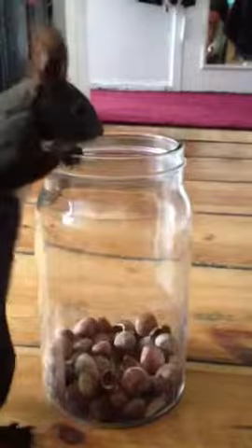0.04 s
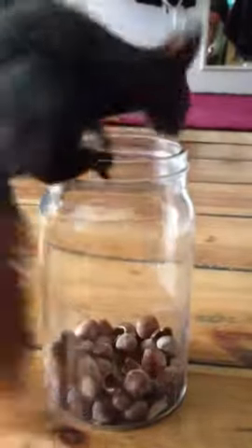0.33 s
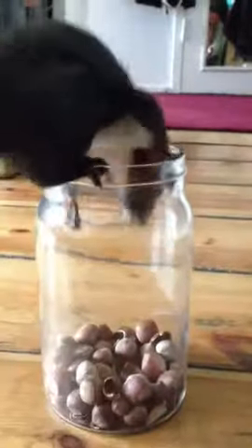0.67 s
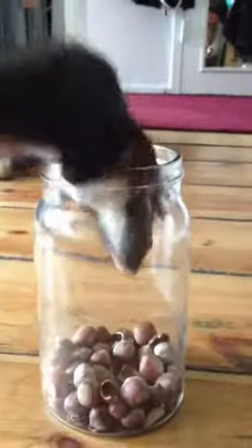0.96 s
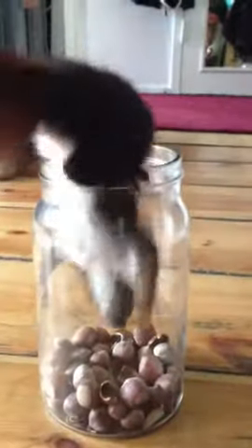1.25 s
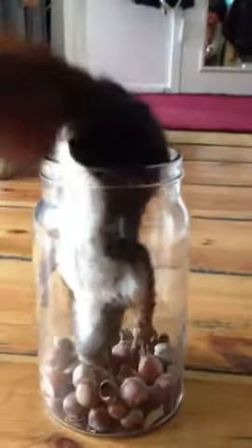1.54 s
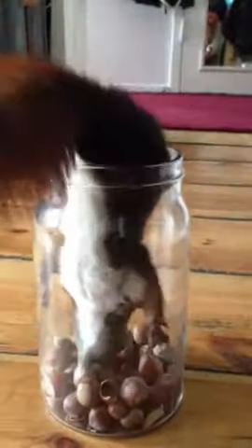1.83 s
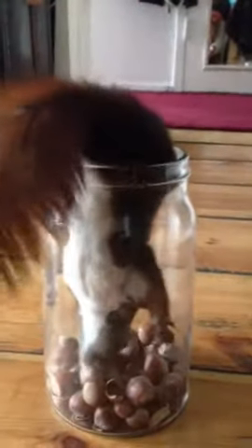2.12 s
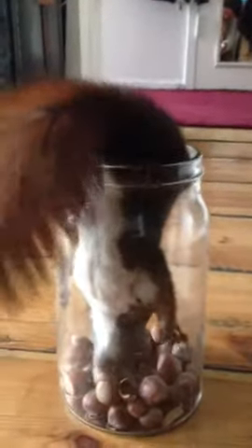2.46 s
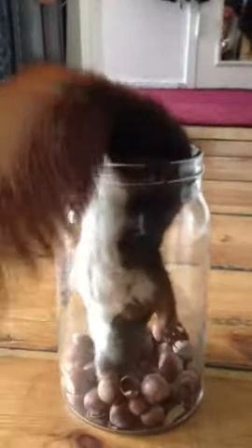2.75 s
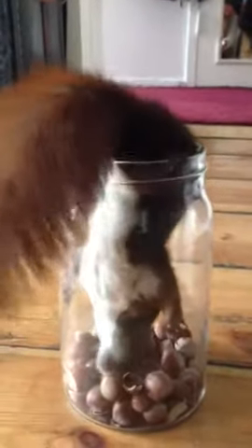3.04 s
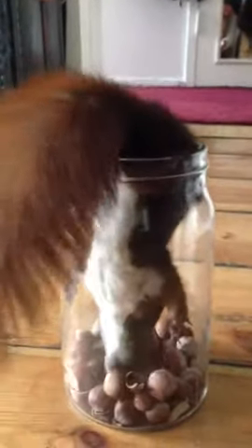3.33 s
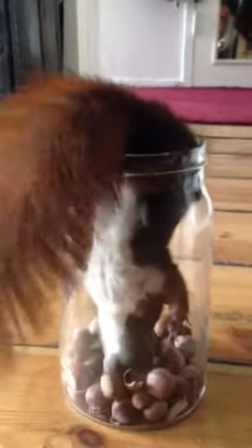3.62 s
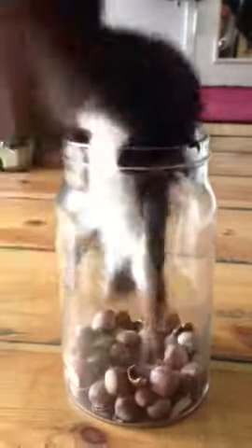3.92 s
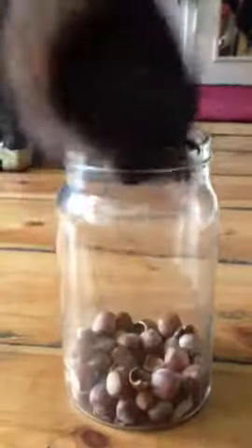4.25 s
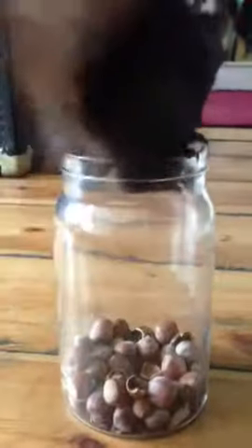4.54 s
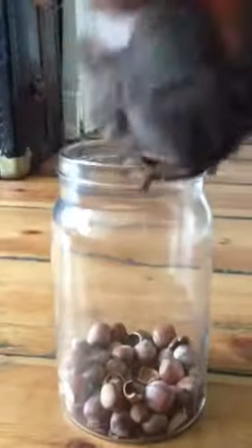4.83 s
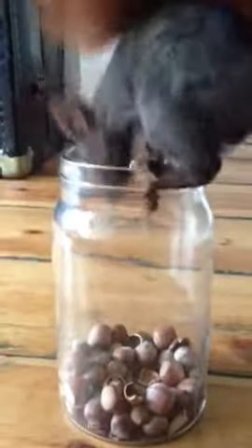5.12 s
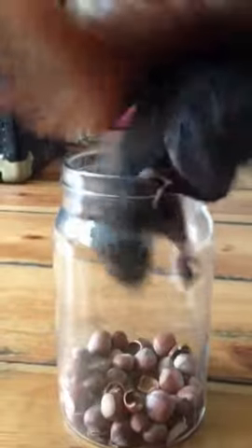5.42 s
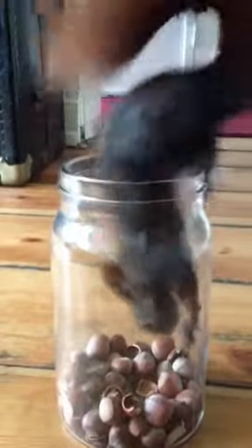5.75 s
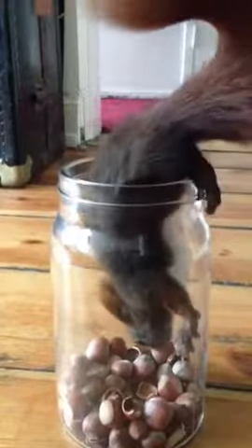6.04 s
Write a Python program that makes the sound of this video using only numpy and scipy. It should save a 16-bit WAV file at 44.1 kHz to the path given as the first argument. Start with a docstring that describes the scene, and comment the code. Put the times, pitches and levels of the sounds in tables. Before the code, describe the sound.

A squirrel rummages in a glass jar, nuts clinking and claws ticking on the glass, with soft thuds on a wooden floor.

```python
"""In a small, quiet room, a glass jar of hazelnuts stands on a wooden floor, and a squirrel rummages in it.
Nuts clink against the glass and make it ring; the loudest one strikes and rattles to rest.
Claws tick and scratch on the wall, soft paws bump it, and fur rubs over the rim.
The squirrel's shifting weight makes the jar thud on the floorboards."""
import sys
import numpy as np
from scipy import signal
from scipy.fft import rfft, irfft, next_fast_len
from scipy.io import wavfile
from scipy.ndimage import map_coordinates

SR = 44100
rng = np.random.default_rng(int(sys.argv[2]) if len(sys.argv) > 2 else 0)


def dump(signal):
    """Clip the signal to [-1, 1] and save it as 16-bit WAV at the path in sys.argv[1]."""
    limited = np.clip(np.atleast_2d(signal).T, -1, 1)
    pcm = np.round(limited * 32767).astype(np.int16)
    wavfile.write(sys.argv[1], SR, pcm)


N = 268128
AGE = np.arange(SR // 2) / SR  # seconds since a hit

# The jar's own tones, called modes: f/Hz, level/dB, time to fade by 60 dB/s
JAR_MODES = [(1309, 0, .24), (2632, 0, .09), (3060, -13, .05), (3120, -2, .07), (3195, -5, .06),
             (3320, -9, .04), (4070, -4, .07), (4158, -2, .09), (4215, -11, .06), (5544, 0, .08),
             (5615, -14, .05), (5921, -14, .11), (6342, -17, .12), (6563, -23, .12), (6819, -17, .12),
             (7425, -8, .11), (7668, -3, .09), (8595, -10, .07), (8755, -12, .08), (9635, -11, .07),
             (9842, -1, .08), (11420, -16, .06), (11600, -15, .06), (11795, -10, .09), (14030, -19, .07),
             (14860, -17, .07)]
# How strongly a nut rings the modes: f/Hz, level/dB
NUT_TONE = [(1310, -22.5), (2630, -15), (3150, -13.5), (4150, -16), (5550, -12.5)]
# How much of a hit's hardness reaches each mode: f/Hz, share
HARDNESS_SHARE = [(3200, 0.026), (4150, 0.48), (5550, 0.96)]
# Nuts hitting the glass: t/s, level/dB, shell f/Hz, hardness/dB, crack level/dB, ring length factor
NUT_HITS = [(2.757, -58.5, 2740, 0, -10, 2.7), (2.936, -71, 2080, -5, 10, .7),
            (2.951, -60.5, 2800, 23, -0.5, 0.75), (3.084, -61, 2550, -5, -12, 3.4),
            (3.118, -59, 3020, 0, 2.5, 1.9), (3.148, -47.5, 3120, -9, 2.5, 0.6),
            (3.1544, -34.5, 3000, 2, -12, 1.3), (3.291, -61.5, 3270, 0, 1, .9),
            (3.36, -55, 3360, 4, -1.5, 1.8), (3.5072, -34, 2870, -2.5, -18, 1.5),
            (3.532, -30.5, 2480, -24, -17, .7), (3.7, -39.5, 2960, -9, -21, 1.27),
            (3.807, -45, 3280, 6.5, -8, 1.5), (4.1298, -24, 3200, 1, -7, 1.3),
            (4.151, -31, 3150, 17, -6, 1.4), (4.16, -17, 2835, 14, -19, 0.98)]
def nuts():
    """Nuts crack against the wall and ring it; their round shells barely stir the high modes."""
    out, hz = np.zeros(N), np.transpose(JAR_MODES)[0]
    dull_db = along([(5600, 0), (5900, -2), (6400, -3), (7400, -12), (7700, -19), (8700, -18),
                     (9800, -40), (11500, -28)], hz)
    for s, db, shell_hz, hard_db, crack_db, sustain in NUT_HITS + rattle():
        shell_db = 14.5 * near(hz, shell_hz, octaves=0.23)  # modes near the shell's pitch ring more
        gains_db = along(NUT_TONE, hz) + shell_db + hard_db * along(HARDNESS_SHARE, hz) + dull_db + 2
        glass = ring(JAR_MODES, gains_db, attack_s=0.0031, sustain=sustain)
        clink = glass + amp(crack_db + 4.5) * crack(shell_hz)
        add(out, s, amp(db) * in_room(clink, wet_db=-19.5))
    return out


def crack(shell_hz):
    """A hard nutshell gives a burst of noise and a short, rough ring at its own pitch."""
    colour = [(100, -15), (400, 3), (800, -4.5), (1150, 0), (1550, 0.5), (2000, -7), (2800, 3),
              (5200, -2.5), (7000, -15.5), (10000, -18.5), (15000, -30)]
    burst = noise(colour, len(AGE)) * fade(0.043)
    band = [(ratio * shell_hz, db) for ratio, db in [(.6, -60), (.93, -14), (1, 0), (1.07, -14), (1.6, -60)]]
    shell = noise(band, len(AGE)) * fade(0.049)
    return (burst + 0.97 * shell) * rise(0.00096)


def rattle():
    """After the loudest hit the nuts settle in seven ever weaker taps, each with another shell."""
    s, db, shell_hz, *_ = max(NUT_HITS, key=lambda nut: nut[1])
    length_s, fade_db_per_s, crack_db = 0.11, 64, -13.5
    taps = []
    for when, pitch in rng.random((7, 2)):
        delay_s = length_s * when
        tap_db = db - 21 - fade_db_per_s * delay_s
        tap_hz = shell_hz * 2 ** ((pitch - .5) / 2)
        taps.append((s + delay_s, tap_db, tap_hz, 0, crack_db, 1))
    return taps


# The floorboards' own tones: f/Hz, level/dB, time to fade by 60 dB/s
BOARD_MODES = [(100.2, -21, 0.25), (157.2, -4, 0.14), (174.8, -3, 0.14), (271, 7.5, 0.063),
               (331.9, 2, 0.095), (355, 0, 0.027), (452, -15.5, 0.065), (640, -13, 0.056)]
# Heavy steps that rock the jar: t/s, level/dB, boost of the higher board modes/dB
HEAVY_STEPS = [(0.231, -29, -5.5), (0.308, -34.5, -11), (0.345, -33, 0.5), (0.531, -51.5, 12.5),
               (0.988, -39, 1.5), (1.164, -45.5, 8), (1.214, -36, 1), (2.749, -52, 5.5), (2.954, -45.5, -1),
               (3.15, -46, 8.5), (3.354, -34, -0.5), (3.545, -46, 1), (4.125, -33.5, 8), (4.182, -35, 0.5),
               (4.267, -28, 1), (4.354, -31.5, -1), (4.385, -35, -6), (4.432, -33.5, -2), (4.468, -36, -11),
               (4.649, -39.5, -1), (4.761, -47.5, 12), (4.787, -33.5, 5), (4.842, -36.5, -8),
               (4.909, -39.5, -3), (4.947, -48, 3.5), (5.166, -47, 7), (5.235, -51, 4), (5.322, -45, 4),
               (5.384, -40, 0), (5.823, -41.5, 3)]
def thuds():
    """Soft paws push the jar onto the boards and stir only the lowest mode of the glass."""
    out, is_upper = np.zeros(N), np.transpose(BOARD_MODES)[0] > 220
    scuff_colour = [(25, -30), (90, 7.5), (300, 1.5), (700, 1.5), (1500, -25.5), (6000, -50.5)]
    push = 1 - np.exp(-(AGE / .006) ** 2)  # the paw takes up the weight gradually
    for s, db, upper_db in HEAVY_STEPS + patter():
        wood = amp(db - 2.5) * ring(BOARD_MODES, is_upper * upper_db, attack_s=0.00417, sustain=0.71)
        scuff = amp(db - 10.5) * fade(0.053) * noise(scuff_colour, len(AGE))
        glass = amp(db - 36) * ring(JAR_MODES[:1], [0], attack_s=0.0064)
        add(out, s, in_room((wood + scuff) * push + glass, wet_db=-13))
    return out


# How strongly a claw rings the modes: f/Hz, level/dB
CLAW_TONE = [(1310, -13), (2630, -8.5), (3150, -6), (4150, -0.5), (5550, -3), (7600, -2.5), (9800, 0)]
# Claws tapping the glass: t/s, level/dB, brightness/(dB per octave), the spot's favourite f/Hz
CLAW_TAPS = [(0.205, -51.5, 2, 2630), (0.482, -55, 0.5, 10800), (.729, -59, 1.5, 10300),
             (1.175, -71, -1, 5550), (1.369, -74, -9, 4150), (1.535, -75.5, -7.5, 3100),
             (4.061, -53, 2.5, 4480), (4.708, -60.5, -3.5, 9000), (4.751, -58.5, 5.5, 3300),
             (5.427, -60, 7.5, 4230), (5.625, -70.5, -14, 4150), (5.74, -69, 6, 11400),
             (5.768, -62.5, 8.5, 4150), (5.788, -47, -0.5, 4100), (5.789, -49.5, -0.5, 7860)]
def claws():
    """Sharp claws tick on the glass and ring it right up to its highest modes."""
    out, hz = np.zeros(N), np.transpose(JAR_MODES)[0]
    tick_colour = [(500, -20), (3500, -3), (8700, 0), (15000, -3)]
    for s, db, bright_db, spot_hz in CLAW_TAPS:
        # each spot on the wall favours the modes near one pitch
        spot_db = 13.5 * near(hz, spot_hz, octaves=0.2) + 1.5 * rng.standard_normal(len(hz))
        gains_db = along(CLAW_TONE, hz) + bright_db * np.log2(hz / 5000) + spot_db + 1.5
        ping = ring(JAR_MODES, gains_db, attack_s=.001, sustain=1.1)
        tick = noise(tick_colour, len(AGE)) * fade(.07) * rise(.0015)
        add(out, s, amp(db) * in_room(ping + amp(bright_db + 2) * tick, wet_db=-18.5))
    return out


# Soft paws bumping the glass: t/s, level/dB
PAW_BUMPS = [(0.308, -61), (.729, -71), (0.987, -61.5), (2.758, -66), (3.118, -59), (3.382, -58),
             (3.701, -55.5), (4.062, -57), (4.384, -52.5), (4.75, -58), (4.901, -63), (5.166, -59.5),
             (5.235, -57.5), (5.625, -49.5)]
def paws():
    """A soft paw on the wall sounds only the jar's lowest mode."""
    out = np.zeros(N)
    for s, db in PAW_BUMPS:
        add(out, s, amp(db) * ring(JAR_MODES[:1], [0], attack_s=0.0022))
    return in_room(out, wet_db=-18)


# Nut hitting nut: t/s, level/dB
SHELL_KNOCKS = [(.029, -46), (.034, -59), (1.54, -64), (1.885, -64), (2.07, -59), (3.298, -56),
                (4.005, -56.5)]
def shells():
    """Nuts knock against each other, hollow and without any ring."""
    out = np.zeros(N)
    colour = [(150, -6), (600, -1), (1800, -11), (2600, -22.5), (14000, -38)]
    for s, db in SHELL_KNOCKS:
        add(out, s, amp(db) * noise(colour, len(AGE)) * fade(0.041))
    return in_room(out, wet_db=-12)


# Spells of scratching: start t/s, end t/s, level/dB
SCRATCH_SPELLS = [(.33, .4, -68), (1.1, 1.35, -73), (2.6, 3.12, -73), (3.28, 3.44, -68), (5.25, 5.6, -72)]
def scratches():
    """Claws skid over the wall in faint slips at random moments, each at a new spot."""
    out, hz = np.zeros(N), np.transpose(JAR_MODES)[0]
    gains_db = along([(1300, -11), (2600, 4), (4100, 4), (5500, 3), (8000, -18), (12000, 9)], hz)
    skid_colour = [(300, -23), (1500, 16.5), (6000, -0.5), (15000, -28.5)]
    for start, end, db in SCRATCH_SPELLS:
        for s in rng.uniform(start, end, size=2 + int(20 * (end - start))):
            spot_db = 3 * rng.standard_normal(len(hz))
            skid = noise(skid_colour, len(AGE)) * fade(0.047)
            glass = ring(JAR_MODES, gains_db + spot_db, attack_s=0.0016, sustain=0.59)
            add(out, s, amp(db) * (glass + skid))
    return in_room(out, wet_db=-6)


# How busy fur and feet are: t/s, level/dB
ACTIVITY = [(0.0, -65), (.2, -63), (.4, -56.5), (.75, -63), (1.15, -64.5), (1.35, -73), (2.4, -72),
            (3.4, -66.5), (4.1, -67), (4.3, -56), (4.55, -59), (4.84, -58.5), (4.98, -68), (5.2, -71),
            (5.4, -60.5), (6.08, -65.5)]
def patter():
    """Light steps fall at random moments, stronger when the squirrel is busy."""
    steps_per_s, scatter_db, upper_db = 9.7, 2, 9
    count = int(steps_per_s * N / SR)
    times = (np.arange(count) + rng.random(count)) / steps_per_s
    levels = np.interp(times, *np.transpose(ACTIVITY)) + 3 + scatter_db * rng.standard_normal(count)
    return [(s, db, upper_db) for s, db in zip(times, levels)]


# The low murmur of the boards: f/Hz, level/dB
MURMUR_TONE = [(24, -54), (40, -23), (129, -2), (156, 6.5), (230, -6.5), (282, -1), (323, 4), (374, -29),
               (411, -4), (477, -16.5), (608, -14), (1000, -38), (1300, -56.5), (2200, -120)]
def shuffle():
    """Many tiny pushes of fur and feet keep the boards murmuring."""
    level_db = np.interp(np.arange(N) / SR, *np.transpose(ACTIVITY)) + 0.5
    pushes = amp(2 * wobble(per_s=35))
    return amp(level_db) * unit(pushes * noise(MURMUR_TONE, N))


# Sliding over the rim: t/s, level/dB
RIM_SLIDE = [(0.62, -82), (1.15, -73.5), (1.3, -94)]
def rub():
    """Fur and paws slide over the rim and draw a soft, wavering tone from the lowest mode."""
    level_db = np.interp(np.arange(N) / SR, *np.transpose(RIM_SLIDE), left=-120, right=-120)
    tone = noise([(1000, -90), (1260, -22), (1309, 0), (1345, -5), (1400, -20), (1700, -90)], N)
    return amp(level_db) * tone


# The background hush: f/Hz, level/dB
HUSH_TONE = [(15, -70), (25, -40.5), (75, -12), (86, -13), (122, -27), (178, 1), (289, -6), (331, -7.5),
             (666, -9), (945, -9.5), (1340, -12.5), (3830, -14.5), (13900, -17), (15500, -18.5)]
def hush():
    """The quiet room is a steady, low rumble with a faint hiss."""
    return amp(-64) * noise(HUSH_TONE, N)


# How long the room echoes: f/Hz, time to fade by 60 dB/s
ROOM_DECAY = [(150, 0.35), (1300, 0.56), (3000, 0.44), (7000, 0.27), (14000, 0.054)]
def in_room(x, wet_db):
    """Add the room's echo at level wet_db; its high notes die away fastest."""
    hz, t, spectrum = signal.stft(rng.standard_normal(len(AGE)), SR, nperseg=256)
    decay = np.exp(-np.log(1000) * t / along(ROOM_DECAY, hz)[:, None])
    tail = signal.istft(spectrum * decay, SR, nperseg=256)[1][:len(AGE)]
    tail *= rise(.01)  # the walls take a moment to answer
    return x + amp(wet_db) * signal.fftconvolve(x, tail / np.linalg.norm(tail))[:len(x)]


def ring(modes, gains_db, attack_s, sustain=1):
    """Fading tones, struck a little differently every time; sustain scales how long they last."""
    chance = rng.standard_normal((len(modes), 2))
    tones = sum(amp(db + gain + stray_db) * fade(t60 * sustain) * np.sin(2 * np.pi * hz * AGE + np.pi * phase)
                for (hz, db, t60), gain, (stray_db, phase) in zip(modes, gains_db, chance))
    return tones * rise(attack_s)


def noise(colour, size):
    """Noise of strength 1, shaped by (f/Hz, level/dB) points."""
    gains = amp(along(colour, np.fft.rfftfreq(size, 1 / SR)))
    return unit(irfft(rfft(rng.standard_normal(size)) * gains, size))


def rise(attack_s):
    """Swell from 0 towards 1 after a hit."""
    return 1 - np.exp(-AGE / attack_s)


def fade(t60):
    """Die away after a hit, by 60 dB in t60 seconds."""
    return np.exp(-np.log(1000) * AGE / t60)


def wobble(per_s):
    """A smooth curve through per_s random values a second."""
    return map_coordinates(rng.standard_normal(int(N * per_s / SR) + 4), [np.arange(N) * per_s / SR])


def near(hz, centre_hz, octaves):
    """1 for a mode at the centre pitch, falling to 0 further off."""
    return np.exp(-(np.log2(hz / centre_hz) / octaves) ** 2)


def along(points, hz):
    """Read between (f/Hz, value) points on a pitch scale."""
    f, values = np.transpose(points)
    return np.interp(np.log(hz + 1), np.log(f + 1), values)


def amp(db):
    """Turn decibels into a volume factor."""
    return 10 ** (np.asarray(db) / 20)


def unit(x):
    """Scale x to an average strength (rms) of 1."""
    return x / np.sqrt(np.mean(x ** 2) + 1e-20)


def add(track, s, x):
    """Mix x into the track at time s."""
    part = track[round(s * SR):][:len(x)]
    part += x[:len(part)]


def scene():
    """Glass, nuts and boards sound over the hush of the room."""
    glass = nuts() + claws() + paws() + scratches() + rub()
    return (glass + shells() + thuds() + shuffle() + hush())[None]


def record(dry):
    """Cut away the very highest treble."""
    size = next_fast_len(N + SR // 2)
    audible = np.fft.rfftfreq(size, 1 / SR) < 15550
    return irfft(rfft(dry, size) * audible, size)[:, :N]


dry = scene()
out = record(dry)
dump(out)
```